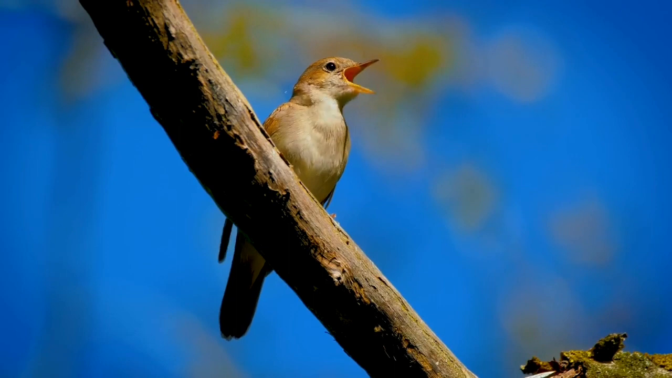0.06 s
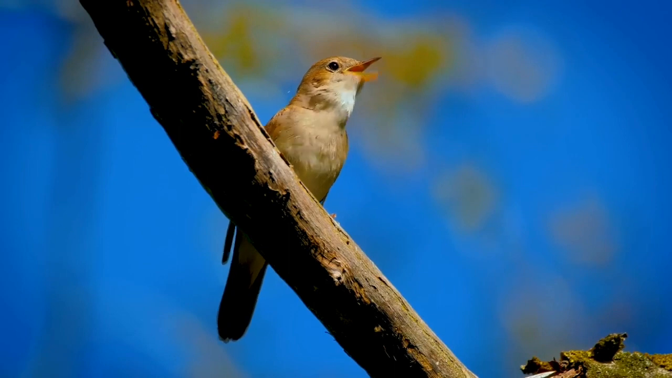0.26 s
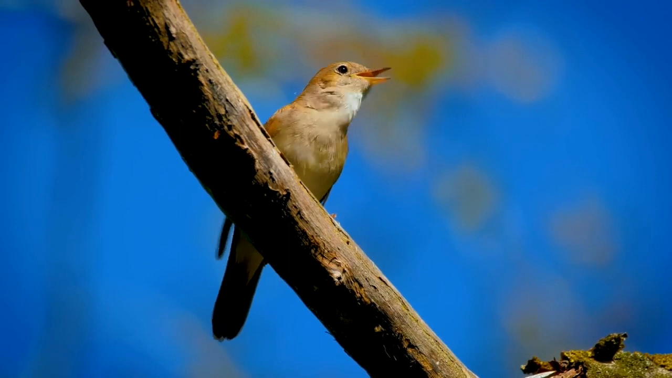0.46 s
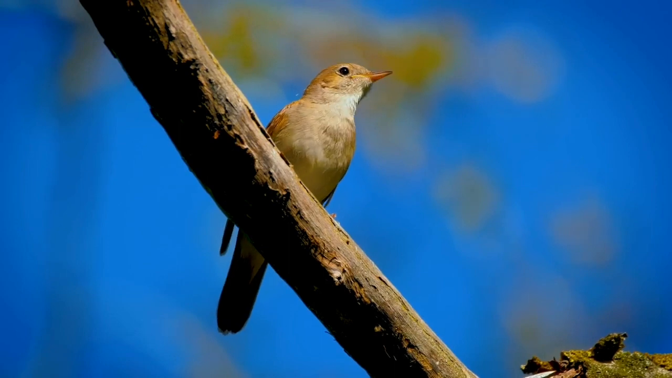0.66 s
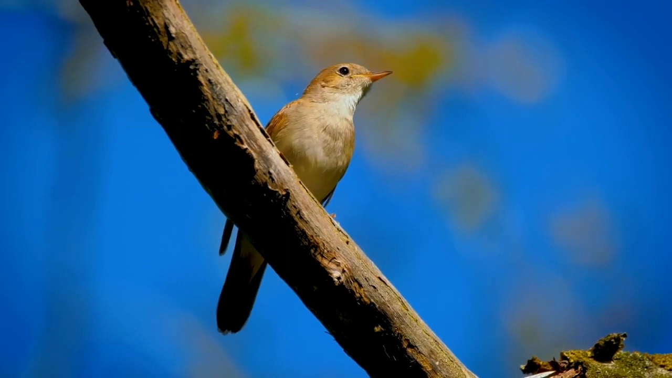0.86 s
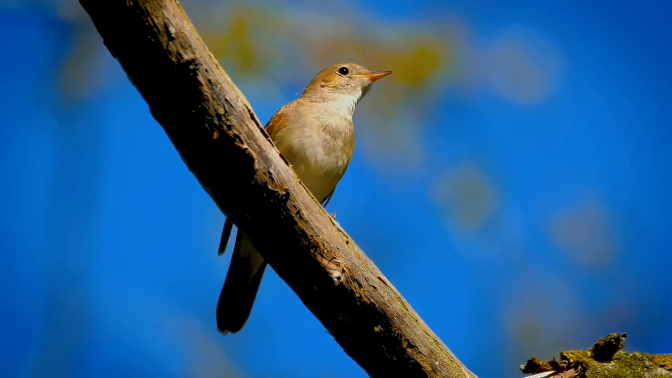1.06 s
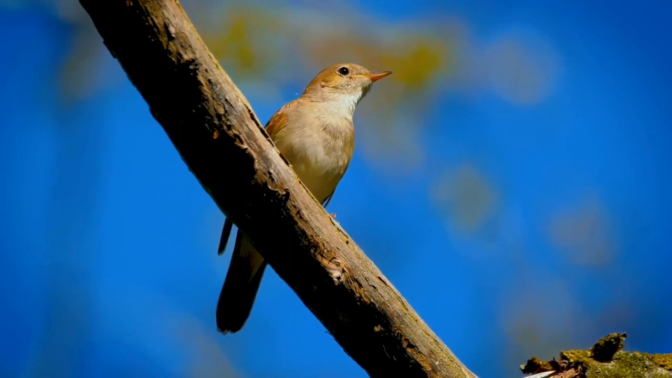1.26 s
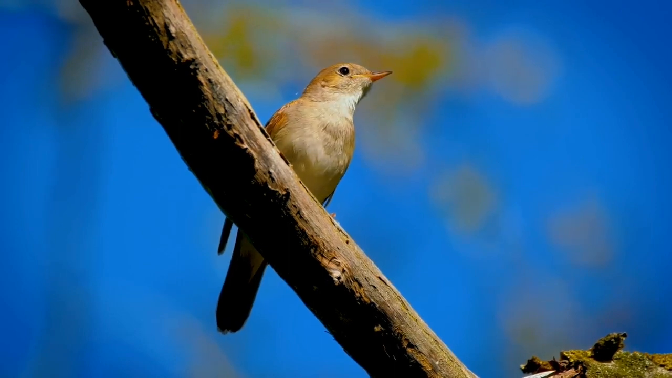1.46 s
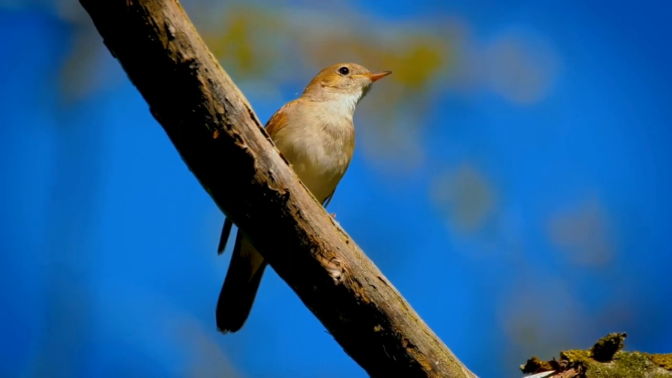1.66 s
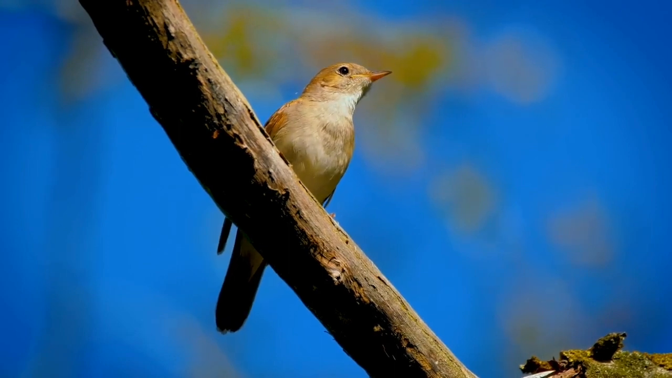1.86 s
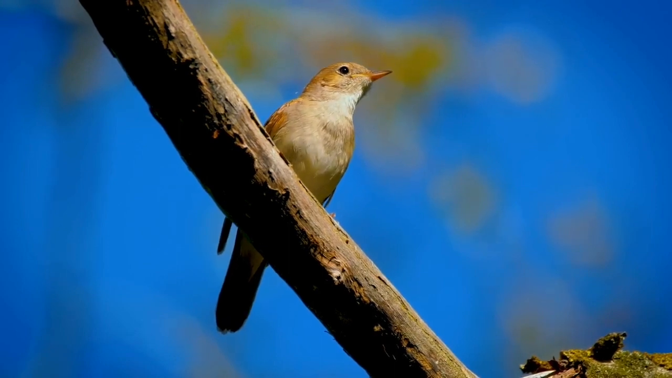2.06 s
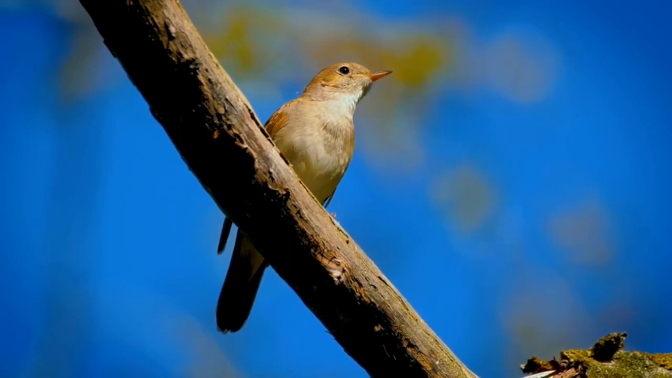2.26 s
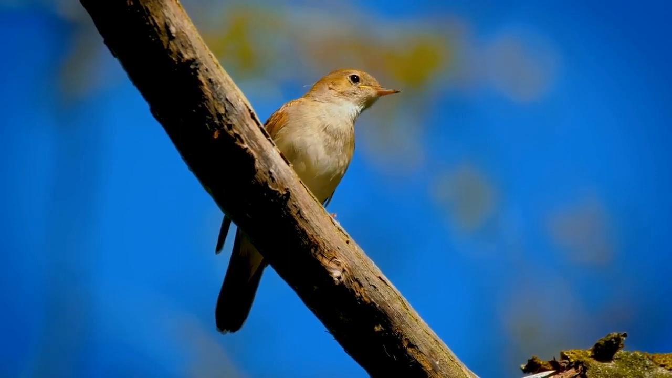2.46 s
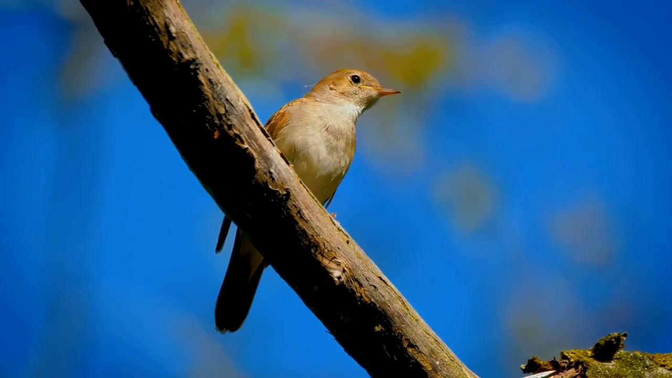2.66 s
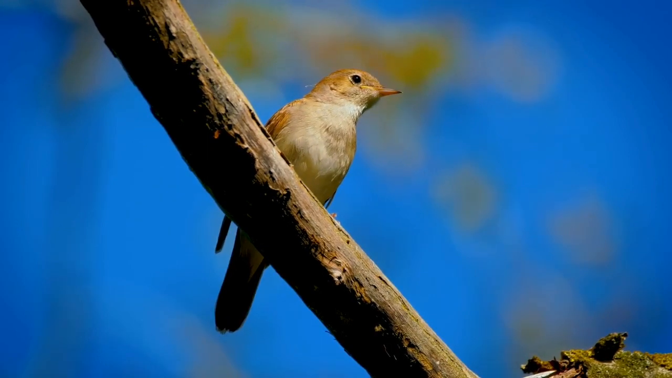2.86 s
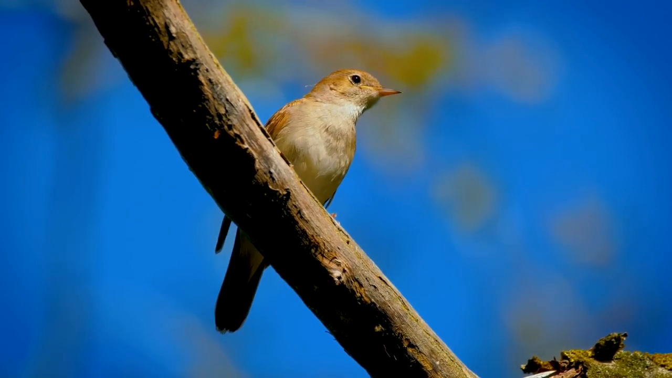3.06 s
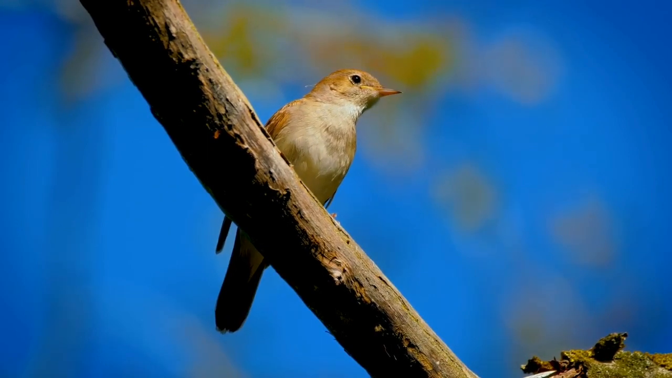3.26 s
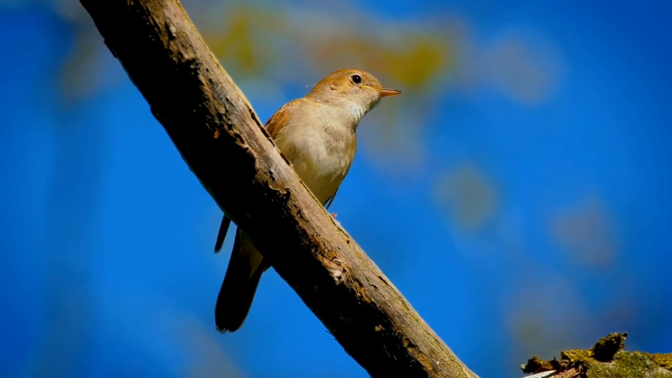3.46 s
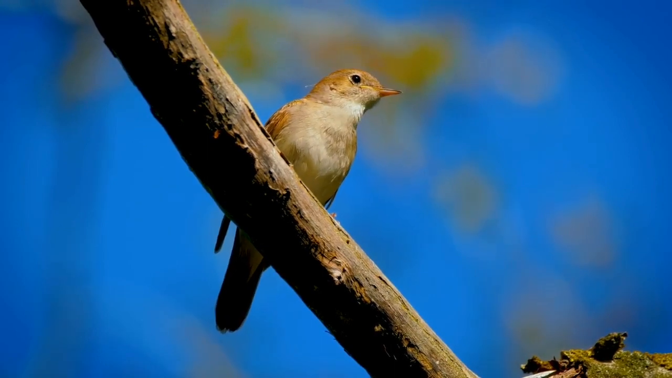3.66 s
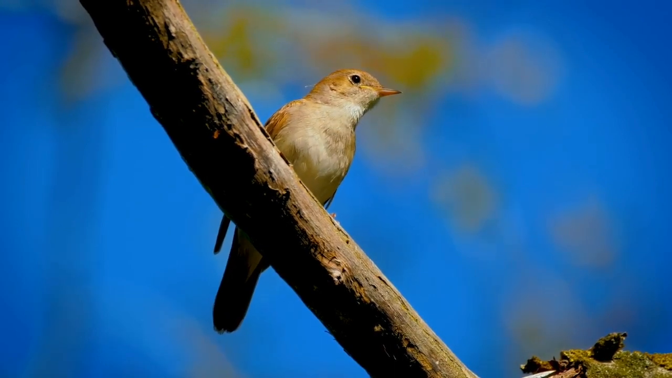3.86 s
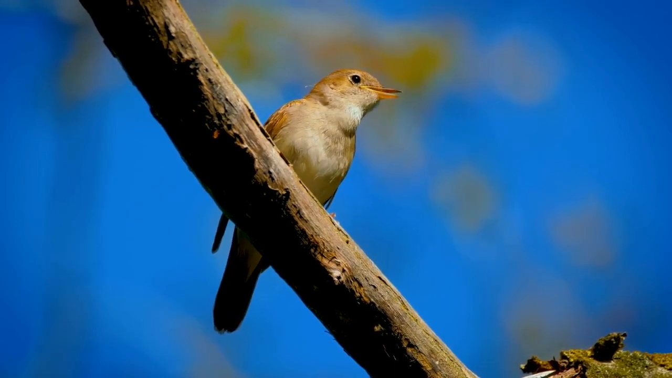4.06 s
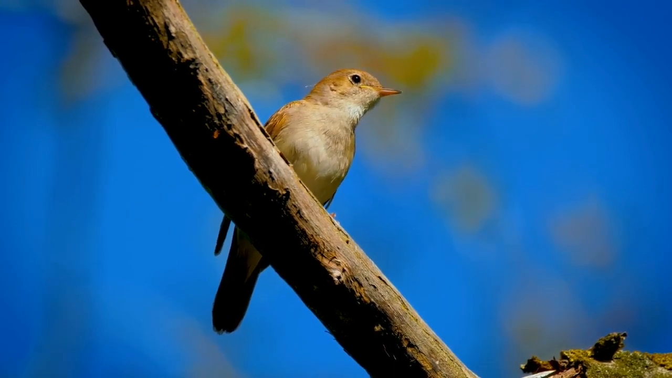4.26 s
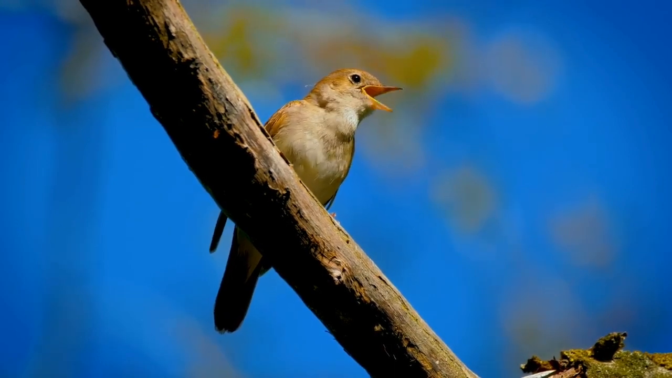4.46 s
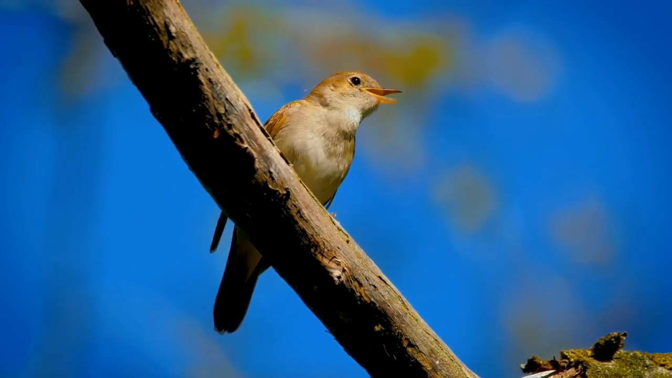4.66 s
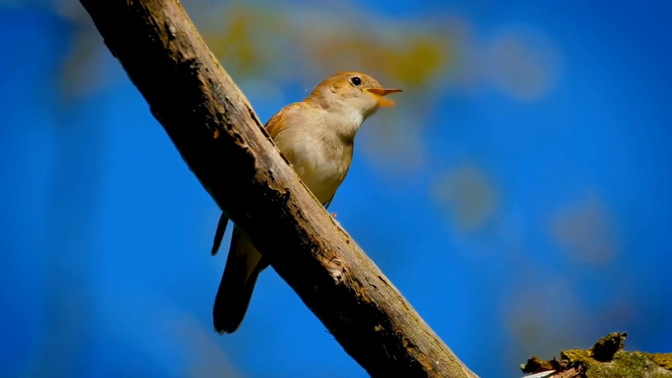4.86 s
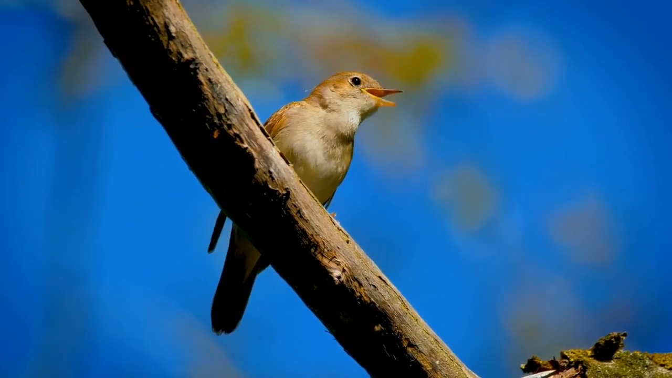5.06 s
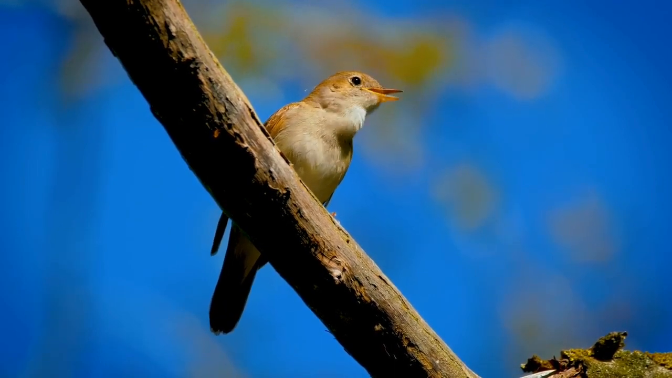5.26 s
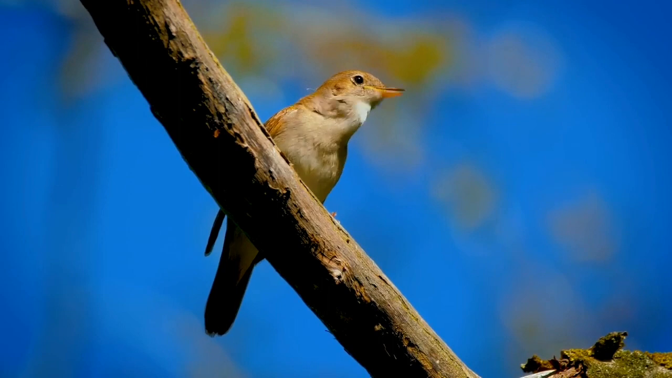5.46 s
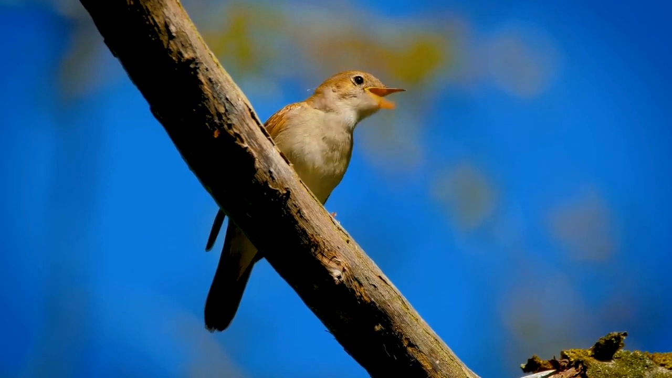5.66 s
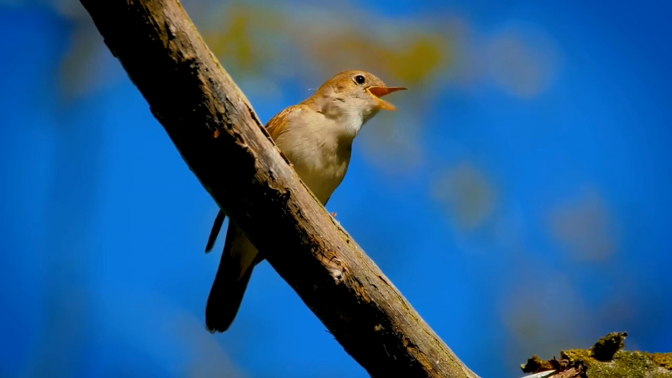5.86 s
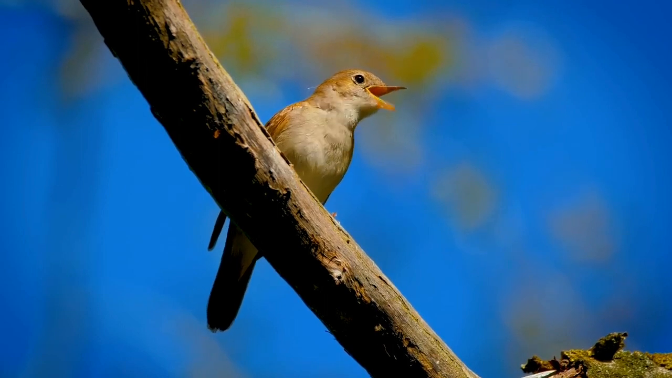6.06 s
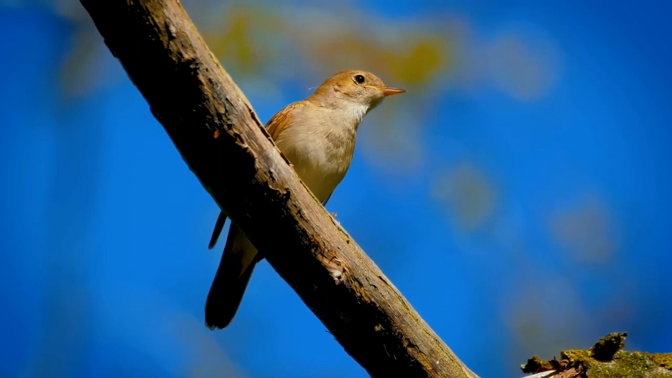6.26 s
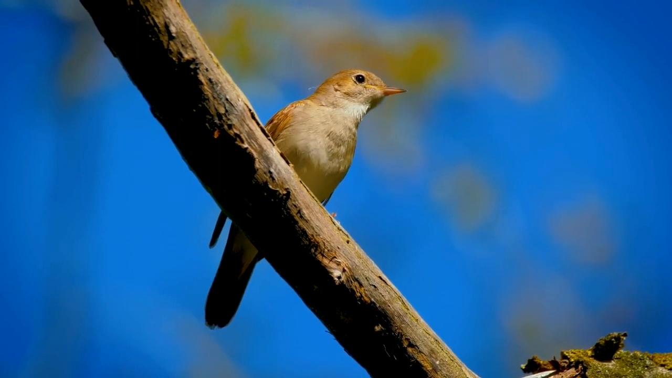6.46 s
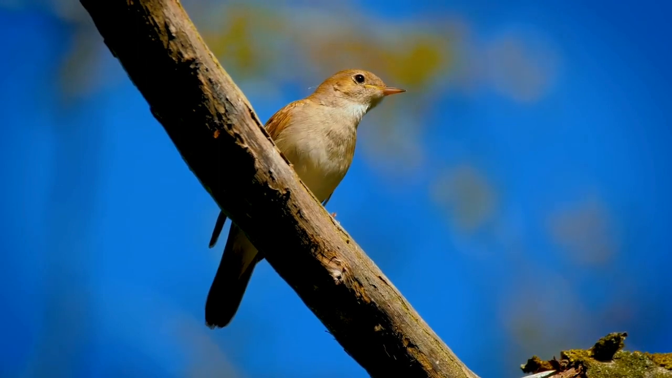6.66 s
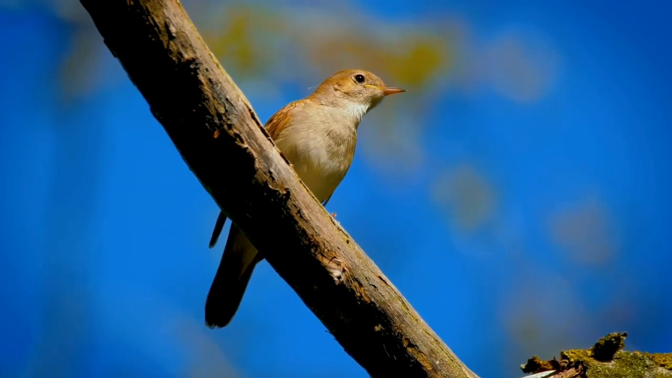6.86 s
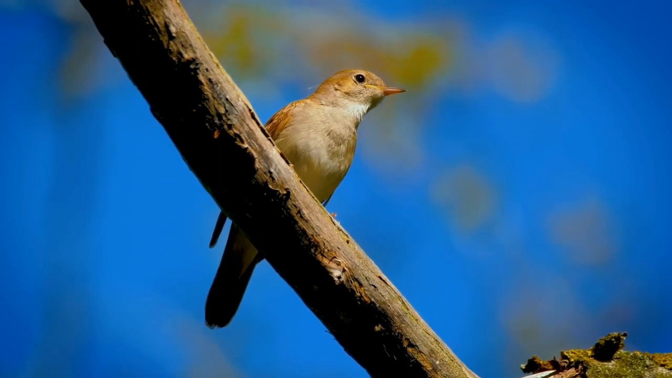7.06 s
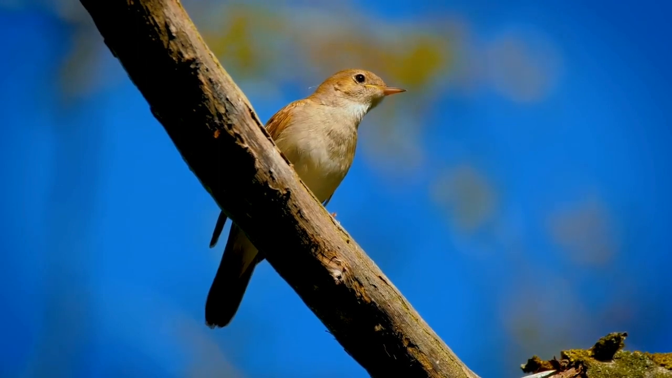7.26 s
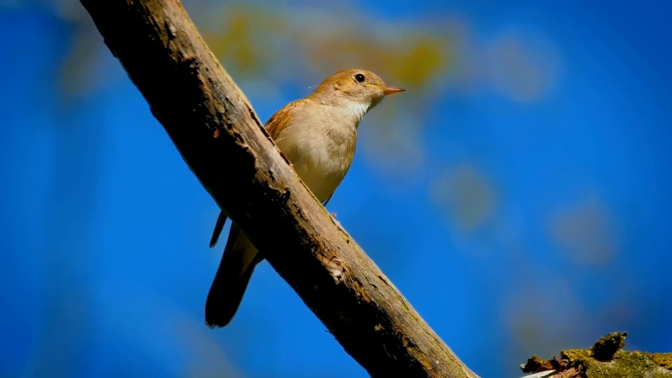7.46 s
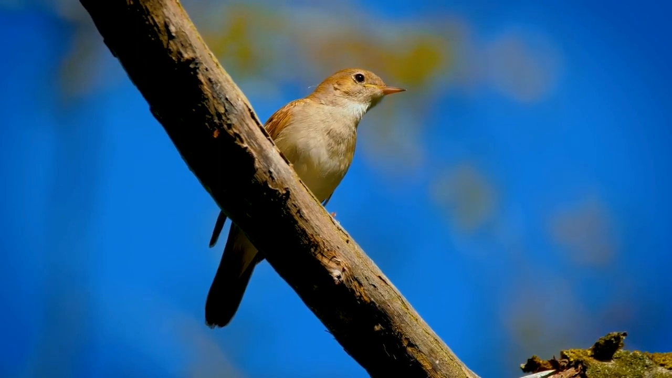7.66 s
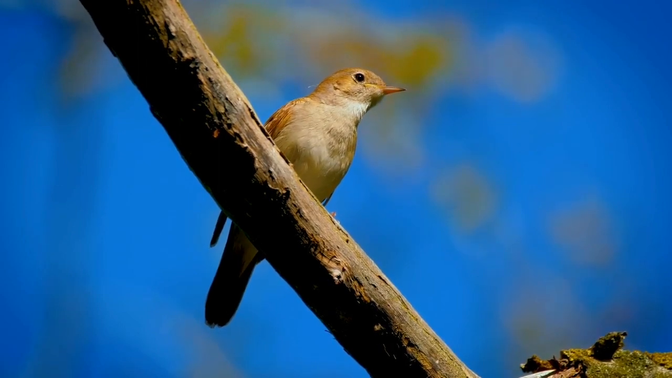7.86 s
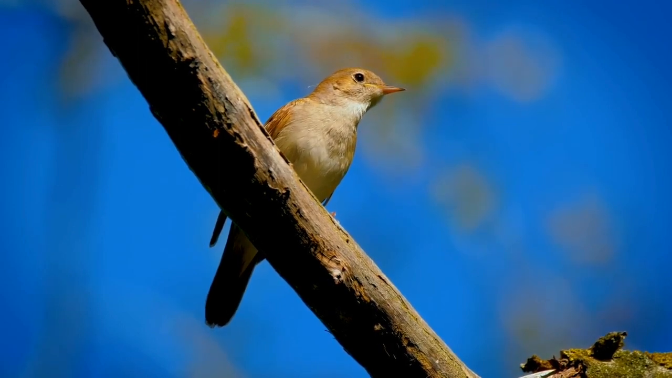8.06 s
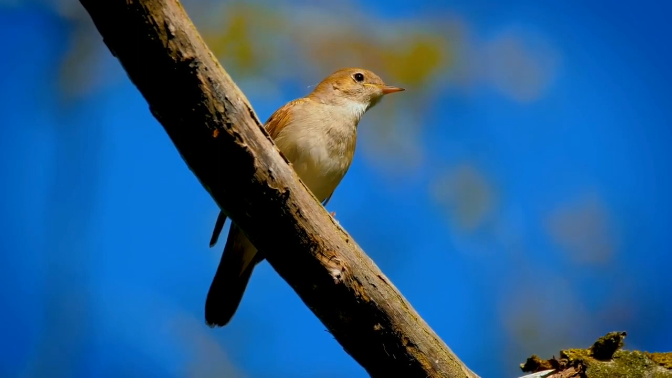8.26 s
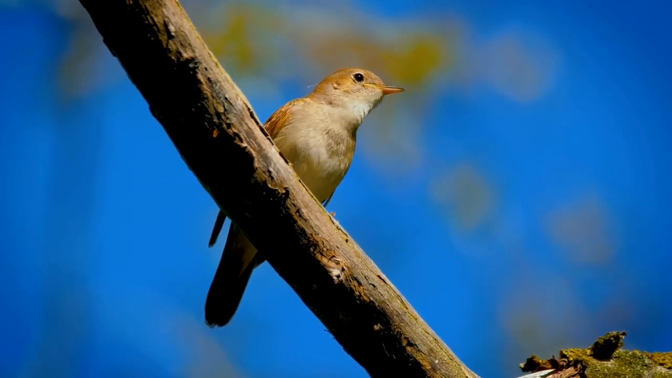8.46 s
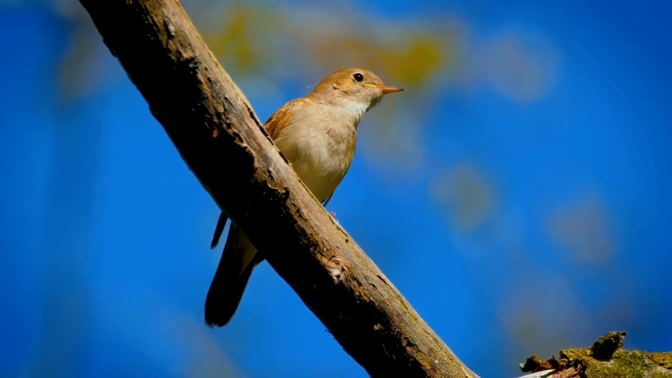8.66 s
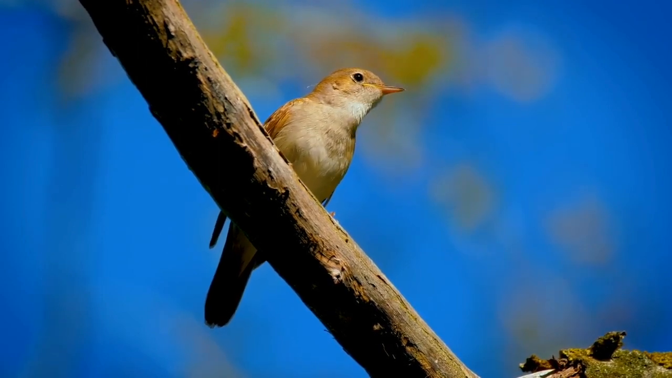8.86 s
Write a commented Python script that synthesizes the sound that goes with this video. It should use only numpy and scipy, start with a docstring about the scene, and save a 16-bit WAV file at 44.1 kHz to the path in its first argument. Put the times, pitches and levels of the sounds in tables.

```python
"""Outdoors among trees, a songbird on a branch sings slides and warbles straight into a close microphone.
Quieter birds call far behind it; a rival whose echo spreads wide answers with a trill, arches and rattles.
Birds are gliding tones with overtones and breath; warbles swing pitch and level together.
Branches return noise-shaped echo, thin in the middle for the birds ahead and wide for the rival.
Earlier song dies away at the start, over a soft rush of filtered noise."""
import sys
import numpy as np
from scipy import signal
from scipy.fft import rfft, irfft, next_fast_len
from scipy.io import wavfile
from scipy.ndimage import map_coordinates

SR = 44100
rng = np.random.default_rng(int(sys.argv[2]) if len(sys.argv) > 2 else 0)


def wav_out(sig):
    """Save sig, one row per channel (or a flat mono array), as 16-bit PCM at SR to the path in sys.argv[1]."""
    wavfile.write(sys.argv[1], SR, np.round(np.clip(np.atleast_2d(sig).T, -1, 1) * 32767).astype(np.int16))


N = 392921

# Note levels are nominal: partials, dips, flutter and small trims come on top.
# outdoor rush, relative spectrum: freq_hz, level_db; then its width: freq_hz, side_minus_middle_db
RUSH = [(30, -38), (70, -49), (130, -27.5), (300, -11), (700, -3.5), (1500, -5), (3500, -5.5), (5500, -14),
        (9000, -22), (15700, -23.5)]
RUSH_SIDE = [(130, -23), (250, -14), (500, -14), (3000, -11), (12000, -4)]
RUSH_DB = -44.5
# song just ended, relative spectrum: freq_hz, level_db
EARLIER = [(1800, -54), (2700, -4), (4200, -4), (5000, -6), (6500, -7), (8200, -7), (9500, -36.5)]
EARLIER_DB, EARLIER_T60_S = -32.5, 1.32
# echo decay among the branches: freq_hz, t60_s
TREES = [(1500, 1), (4000, 1), (9000, 0.59)]
TOP_HZ = 15800
# partials of a clear note: level_db
OVERTONES = [1, -38, -45, -56, -50]

# near bird, beating shape: length_s, pitch_ratios, beat_hz, levels_db (early, middle, late)
BUZZ = (.036, [1.29, 1.022, 0.81], 134, [-16.5, -4, -3])
# start_s, middle_hz, swing_share, lead_turns, level_db
BUZZES = [(.023, 6520, 0.087, 0.58, -6.5), (.109, 6790, 0.058, 0.23, -7.5), (.203, 6800, 0.04, .91, -8.5)]
# near bird, syllable shapes: length_s, pitch_ratios at even steps, levels_db (early, middle, late)
SCOOP = (.053, [.5, .84, 1.0, 1.077, 1.09], [-17, 0, -2.5])
CREST = (.054, [.83, .865, .925, 1, .89, .77, 0.52], [-5.5, 0, -10.5])
LIFT = (0.0281, [.855, 0.929, 1, 1.05, 1.075], [-3, 0, -0.8])
DROP = (.027, [1.24, 1.147, 0.987, 0.827, 0.65], [0, -4, -17.5])
ZIP = (0.011, [.464, .755, 1.0, 1.31, 1.48], [-2, 0, -6])
# each syllable as sung: start_s, middle_hz, level_db
SCOOPS = [(0.282, 2218, -5), (.461, 2115, -9)]
CRESTS = [(.366, 3416, -5), (.553, 3297, -5.5)]
LIFTS = [(5.43, 2670, -5.5), (5.555, 2620, -5.5), (5.672, 2698, -5)]
DROPS = [(5.474, 1838, -8.5), (5.596, 1935, -9), (5.716, 1930, -9.5)]
ZIPS = [(6.127, 5140, -7), (6.226, 5490, -14.5)]
# partials of a scoop: level_db
SCOOP_PARTIALS = [0, -33, -54]
# whistles sung once: start_s, length_s, five pitches_hz at even steps, early_db, middle_db, late_db
WHISTLES = [(2.176, 0.097, 2355, 2213, 2597, 2564, 2660, -44, -39.5, -42),
            (5.812, 0.03, 4640, 4975, 4990, 5086, 4730, -15, -9, -11.5),
            (5.853, 0.037, 7460, 7280, 6660, 6470, 5070, -25, -14, -12),
            (5.936, 0.042, 2120, 2166, 2225, 2237, 2090, -15.5, -5.5, -15.5),
            (6.01, 0.053, 2785, 2808, 2633, 2512, 2560, -8, -5.5, -8),
            (6.164, 0.01, 3550, 3160, 2800, 2370, 1990, -9, -27, -29),
            (6.238, 0.023, 7250, 5940, 5200, 4730, 3840, -25.5, -14.5, -11)]
# short noisy note with a strong echo, ending the first phrase: start_s, level_db
TACK = (.658, -13.5)
# its noise, relative spectrum: freq_hz, level_db
TACK_COLOUR = [(470, -68), (800, -49), (3250, -8.5), (5750, -3), (9090, -33), (14000, -18.5),
               (15500, -49.5)]
# its nasal fall: length_s, start_hz, middle_hz, end_hz; then its partials: level_db
TACK_TONE = (0.018, 1750, 1450, 950)
TACK_PARTIALS = [-17.5, -1, -5, -11]
# long warbles: start_s, length_s, start_hz, end_hz, swing_share, beat_hz, lead_turns, first_db, full_db
ROLLS = [(3.818, .11, 3714, 3660, 0.098, 40.1, .31, -32, -15.5),
         (4.138, 0.16, 3527, 3594, 0.095, 44.1, 0.2, -28, -9.5),
         (4.46, .18, 3595, 3754, .09, 44.25, 0.049, -28, -7.5),
         (4.774, .224, 3757, 3680, .105, 42.9, 0.37, -25, -5.5),
         (5.151, .19, 3723, 3631, .11, 43.04, 0.11, -17.5, -5.5)]
# swing through a roll, as ratios of swing_share: start, middle, end; then partials: level_db
ROLL_SWING = [.56, 1.02, 0.67]
ROLL_PARTIALS = [-1, -45.5, -42.5, -52.5]
ROLL_SWELL_DB_PER_S, ROLL_TIRE_DB_PER_S = 210.5, 15
ROLL_HURRY = .14  # share by which the softest beat runs faster
ROLL_SHARP = 0.41  # trough sharpness per unit of effort above 0.3
ROLL_DIP_DB, ROLL_LAG_RAD = 13.21, 0.71  # dip once a turn at full effort, and its lag
ROLL_LEAN_RAD = .7  # at full effort the trough comes this early: quick fall, slow climb
# beating shape: length_s, pitch_ratios, swing_shares, beat_hz, levels_db (early, middle, late)
TUMBLE = (0.025, [1.36, 0.97, 0.75], [0.051, 0.085, .04], 117.5, [-0.5, -0.8, 0])
# start_s, middle_hz, lead_turns, level_db
TUMBLES = [(6.143, 4200, .33, -6.5)]

# rival, slides: start_s, length_s, start_hz, end_hz, level_db
RIVAL_SLIDES = [(.62, 0.061, 2324, 3337, -33.5), (5.287, 0.021, 7140, 5680, -50),
                (5.38, 0.025, 6900, 5280, -49), (5.478, 0.027, 4670, 4750, -33.5),
                (6.78, 0.031, 6650, 6300, -40.5), (6.865, 0.0059, 3610, 3500, -32.5),
                (6.929, 0.021, 4430, 1890, -30), (7.268, 0.023, 3590, 4140, -41),
                (7.29, .018, 4140, 3500, -51), (7.412, 0.0062, 2230, 1700, -34),
                (7.43, 0.01, 3030, 2240, -39.5)]
# rival, rattles: start_s, length_s, start_hz, middle_hz, end_hz, swing_share, beat_hz, lead_turns,
# early_db, late_db
RIVAL_WARBLES = [(5.5, 0.079, 4300, 4490, 4670, 0.19, 73.9, 0.86, -28.5, -26.5),
                 (7.029, 0.051, 5330, 4830, 3740, 0.089, 123.2, 0.32, -27, -28),
                 (7.069, 0.12, 3640, 3450, 2843, 0.15, 122.3, 0.13, -26.5, -28),
                 (7.186, 0.097, 2802, 2616, 2440, 0.14, 65, 0.29, -25.5, -26.5),
                 (7.284, 0.092, 2373, 2200, 2200, 0.16, 56.1, 0.25, -30.5, -37.5)]
# rival, even trill: start_s, level_db; then pitch_hz through one syllable
TRILL = [(5.669, -17.5), (5.732, -16.5), (5.797, -17.5), (5.858, -14), (5.92, -15), (5.985, -17),
         (6.05, -15.5), (6.114, -14), (6.176, -14.5)]
ARCH = [3720, 4380, 3660, 3297, 3940]
# rival, arched syllable: length_s, pitch_ratios, levels_db; then start_s, middle_hz, level_db
BOW = (.077, [1.02, 1.15, 1.215, 1.02, .83, 0.725, 0.72], [0, -2.5, -12])
BOWS = [(6.237, 3228, -15.5), (6.415, 3160, -15), (6.59, 3183, -16)]
# rival, repeated notes (a flick follows each bow): length_s, start_hz, middle_hz, end_hz;
# then start_s, level_db
FLICK = (0.017, 5400, 4150, 3550)
FLICKS = [(6.339, -21), (6.515, -20.5), (6.69, -20)]
HOOP = (.032, 4300, 7300, 4700)
HOOPS = [(6.778, -41), (6.855, -39)]
WIGGLE = (0.0376, 1440, 2200, 1830)
WIGGLES = [(7.047, -55), (7.078, -51), (7.112, -53)]

# far birds, plain slides: start_s, length_s, start_hz, end_hz, level_db
SLIDES = [(1.49, 0.056, 3190, 3690, -53), (1.55, 0.073, 3660, 3580, -51.5), (1.845, .03, 5000, 3940, -64),
          (1.85, 0.041, 6300, 5200, -59), (1.888, 0.0187, 3550, 2430, -34), (1.906, 0.029, 2500, 1500, -51),
          (2.06, 0.027, 6600, 5400, -52), (2.282, 0.0194, 3310, 2880, -37), (2.298, .014, 3300, 4180, -40),
          (2.52, 0.031, 5240, 5170, -54), (2.6, 0.019, 6200, 4100, -42), (2.683, .018, 6000, 6320, -41),
          (2.693, 0.03, 6100, 4080, -40), (2.772, 0.031, 2120, 1916, -37), (2.819, 0.027, 2990, 2230, -39),
          (3.197, 0.0067, 3600, 3710, -42), (3.209, 0.041, 3500, 2870, -56), (3.402, 0.05, 4200, 2620, -43),
          (3.735, 0.022, 4010, 3180, -39), (4.0, 0.064, 4060, 4650, -51), (7.49, 0.26, 3815, 3605, -52.5),
          (7.41, .011, 3280, 4610, -22), (7.419, 0.0088, 4700, 5650, -35.5),
          (7.436, 0.012, 4270, 3200, -29.5), (7.61, 0.077, 4300, 4236, -54),
          (7.665, 0.037, 2800, 2420, -37.5), (7.805, 0.05, 3900, 3870, -43.5),
          (7.97, 0.0314, 3040, 2595, -42), (8.07, 0.046, 3725, 4060, -38), (8.109, 0.0048, 5000, 6000, -35),
          (8.128, 0.04, 6170, 4260, -39.5), (8.245, .05, 3850, 3130, -46.5),
          (8.02, 0.0092, 4850, 4350, -44), (8.33, .03, 1800, 1650, -47), (8.375, 0.037, 1750, 1820, -55),
          (8.49, 0.056, 2900, 2780, -37), (8.704, 0.062, 2050, 2117, -39), (1.19, .14, 3300, 2535, -53),
          (3.975, 0.029, 5000, 4750, -53), (7.82, 0.0174, 5010, 4400, -49), (7.85, 0.042, 4000, 2910, -40),
          (8.05, 0.027, 3640, 3200, -42)]
HALFWAY = .58  # share of a slide's path covered at half time
# far birds, repeated notes: length_s, start_hz, middle_hz, end_hz; then start_s, level_db
RUNG_UP = (.048, 1700, 2180, 2560)
RUNGS_UP = [(7.698, -38), (7.845, -38), (7.998, -36)]
RUNG_DOWN = (.048, 2720, 2450, 1790)
RUNGS_DOWN = [(7.535, -37.5), (7.74, -41), (7.929, -37.5)]
HUMP = (0.031, 2300, 2330, 2100)
HUMPS = [(2.651, -41.5), (2.842, -41.5), (3.024, -38.5)]
# thin high tones leading into the pipes, same columns
THREAD = (0.089, 5000, 6650, 3900)
THREADS = [(4.365, -74), (4.834, -56), (5.3, -62)]
# far birds, beating shape: length_s, pitch_ratios, swing_shares, beat_hz, levels_db
PURR = (.066, [1.04, 0.93, 0.95], [.11, 0.094, 0.13], 72, [-1.7, 0, -9])
# start_s, middle_hz, lead_turns, level_db
PURRS = [(2.553, 3970, 0.6, -35.5), (2.738, 3790, .3, -36), (2.92, 3810, .81, -36.5)]
# low double notes: start_s, chirp_db, first_db, second_db
CHUCKS = [(2.97, -38, -39, -36.5), (3.1, -37.5, -40, -36.5), (3.222, -40.5, -41, -33),
          (3.345, -40.5, -41, -34.5), (3.472, -37.5, -35.5, -32), (3.598, -44.5, -43, -31.5),
          (3.73, -37.5, -37, -31), (3.863, -36.5, -37, -36.5)]
# steep chirp ahead of each: length_s, start_hz, middle_hz, end_hz
CHIRP = (.012, 5700, 4200, 2600)
CHIRP_LEAD_S = 0.016
# nasal calls rich in overtones: start_s, level_db; then partials: level_db
HARSH = [(3.565, -38.5), (8.56, -34.5)]
NASAL = [-4.5, 19.5, 20.5, 10, -16]
# far notes settling on a held pitch: glide_s, start_ratio, hold_loss_db;
# then start_s, length_s, held_hz, level_db
HOOK = (0.034, 1.53, 15.3)
HOOKS = [(4.191, 0.086, 2616, -31), (4.645, 0.15, 2605, -27.5), (5.094, 0.16, 2570, -28)]
PIPE = (0.015, 1.06, 4.1)
PIPES = [(4.415, 0.13, 4632, -36.5), (4.876, 0.092, 4620, -32), (5.33, 0.099, 4630, -37)]
# far low creaks: length_s, start_hz, end_hz; then start_s, level_db; then partials: level_db
CROAK = (0.013, 950, 593)
CROAKS = [(8.843, -37.5), (8.868, -32), (8.895, -30)]
CROAK_PARTIALS = [-18, 3, 12.5, 14.5, -1, 5.5]


def amp(db):
    """Gain of a level in dB."""
    return 10 ** (np.asarray(db) / 20)


def along(points, hz):
    """Interpolate (freq_hz, value) points on a log frequency axis."""
    f, v = np.transpose(points)
    return np.interp(np.log(hz + 1), np.log(f + 1), v)


def filtered(x, response):
    """Shape the spectrum of x by a response of frequency."""
    m = next_fast_len(x.shape[-1] + 8192)
    spectrum = rfft(x, m) * response(np.fft.rfftfreq(m, 1 / SR))
    return irfft(spectrum, m)[..., :x.shape[-1]]


def spread(pair, side_db):
    """Left and right from a middle and a side signal."""
    middle, side = pair[0], amp(side_db) * pair[1]
    return np.array([middle + side, middle - side])


def through(values, u):
    """The smooth curve through evenly spaced values, u from 0 to 1."""
    knots = np.linspace(0, 1, len(values))
    return np.polyval(np.polyfit(knots, values, len(values) - 1), u)


def span(length):
    """Progress from 0 to 1 over a note."""
    return np.linspace(0, 1, max(round(length * SR), 20))


def thirds(levels_db, u):
    """Gain that passes through one level in each third of the note."""
    return amp(np.interp(u, [.1, .5, .9], levels_db))


def blank():
    """Empty track with room for late notes: direct sound in row 0, echo send in row 1."""
    return np.zeros((2, N + SR))


def add(track, s, hz, gain, partials_db=OVERTONES, edge=0.0046, hiss_db=-138):
    """A gliding tone with soft ends into row 0, and what the trees get of it into row 1."""
    t = np.arange(len(hz)) / SR
    phase = 2 * np.pi * (np.cumsum(hz) / SR + rng.random())
    far = 1 / np.max(gain)  # a faint note is a far one
    # high notes open the beak; distance dulls the overtones
    beak = amp(41.3 * np.maximum(np.log2(hz / 4200), 0)) * far ** -.4
    tone = 0
    for k, db in enumerate(partials_db, start=1):
        partial = amp(db) * np.sin(k * phase) * (k * hz < SR / 2)
        tone = tone + partial * beak ** (k > 1)
    # steep slides are breathy
    slope = np.abs(np.gradient(hz) * SR)
    hiss = amp(hiss_db) * slope * np.diff(rng.standard_normal(len(t) + 1)) * far ** -.3
    flutter = map_coordinates(rng.standard_normal(len(t) // 100 + 4), [t * 200])
    ends = np.sin(np.pi / 2 * np.clip(np.minimum(t, t[-1] - t) / edge, 0, 1)) ** 2
    # air and leaves shake the level on a long path
    heard = gain * ends * (tone + hiss) * far ** (0.084 * flutter)
    # echo loses less with distance than direct sound
    track[:, round(s * SR):][:, :len(t)] += heard * [[1], [far ** 0.38]]


def sung(shape, events):
    """Whistle rows from one shape."""
    length, pitch, levels_db = shape
    return [(s, length, *hz * np.array(pitch), *db + np.array(levels_db)) for s, hz, db in events]


def beaten(shape, events):
    """Warble rows from one shape."""
    length, pitch, swing, beat, levels_db = shape
    return [(s, length, *hz * np.array(pitch), *swing, beat, lead, *db + np.array(levels_db))
            for s, hz, lead, db in events]


def slid(table):
    """Note rows that move faster at first."""
    return [(s, length, a, a + HALFWAY * (b - a), b, db) for s, length, a, b, db in table]


def repeated(shape, events):
    """Note rows from one shape."""
    return [(s, *shape, db) for s, db in events]


def rush():
    """Distant leaves and traffic: coloured noise, nearly steady."""
    def colour(hz):
        return amp(along(RUSH, hz) + [0 * hz, along(RUSH_SIDE, hz)])

    slow = map_coordinates(rng.standard_normal(40), [np.arange(N) * 3 / SR])
    pair = filtered(rng.standard_normal((2, N)), colour)
    return amp(RUSH_DB + 0.68 * slow) * spread(pair / pair[0].std(), side_db=0)


def earlier():
    """The dying echo of the song that went before: coloured noise in steady decay."""
    pair = filtered(rng.standard_normal((2, N)), lambda hz: amp(along(EARLIER, hz)))
    decay_db = EARLIER_DB - 60 * np.arange(N) / SR / EARLIER_T60_S
    return amp(decay_db) * spread(pair / pair.std(), side_db=-9)


def trees(x, side_db, swell, swell_t60):
    """Scattered echo, near branches first, treble dying soonest; each stretch of sound meets other branches."""
    out, step = np.zeros((2, N + 2 * SR)), SR // 5
    fade = np.hanning(2 * step + 1)[:-1]  # overlapping stretches sum to one
    x = np.pad(x, (step, 2 * step))
    for start in range(0, N + step, step):
        hz, t, z = signal.stft(rng.standard_normal((2, SR)), SR, nperseg=256)
        decay = amp(-60 * t / along(TREES, hz)[:, None])
        near_branches = 1 + swell * amp(-60 * t / swell_t60)
        tail = signal.istft(z * decay * near_branches, SR, nperseg=256)[1]
        stretch = x[None, start:start + 2 * step] * fade
        wet = signal.fftconvolve(stretch, tail / np.linalg.norm(tail[0]), axes=1)
        out[:, start + 150:][:, :wet.shape[1]] += wet  # 150 samples of extra path
    return spread(out[:, step:step + N], side_db)


def warbles(table, sharp, pulse_db, lag):
    """Pitch swings with round crests and sharp troughs; once a turn the sound weakens, more at full effort."""
    track = blank()
    loudest = amp(np.max([row[-3:] for row in table]))
    for s, length, a, b, c, d, e, f, rate, lead, *levels in table:
        u = span(length)
        turn = 2 * np.pi * (rate * length * u - lead)
        effort = thirds(levels, u) / loudest
        swing = np.cos(turn) - effort * sharp * np.cos(2 * turn)
        hz = through([a, b, c], u) * (1 + np.interp(u, [0, .5, 1], [d, e, f]) * swing)
        level_swing_db = effort * pulse_db * (np.cos(turn - lag) - .6 - sharp * np.cos(2 * turn))
        add(track, s, hz, thirds(levels, u) * amp(level_swing_db), hiss_db=-143)
    return track[:, :N]


def buzzes():
    """The near bird's opening notes, high and beating fast at an even swing."""
    length, pitch, beat, levels_db = BUZZ
    rows = []
    for s, hz, swing, lead, db in BUZZES:
        rows += beaten((length, pitch, [swing] * 3, beat, levels_db), [(s, hz, lead, db)])
    return warbles(rows, sharp=0.5, pulse_db=6, lag=1.1)


def whistles(table, partials_db=OVERTONES):
    """Each whistle is one smooth slide of the syrinx."""
    track = blank()
    for s, length, *rest in table:
        u = span(length)
        level_db = np.polyval(np.polyfit([.1, .5, .9], rest[-3:], deg=2), u)
        add(track, s, through(rest[:-3], u), amp(level_db), partials_db, edge=.005)
    return track[:, :N]


def notes(table):
    """Short plain slides."""
    track = blank()
    for s, length, *pitch, db in table:
        add(track, s, through(pitch, span(length)), amp(db), edge=min(0.15 * length, .012))
    return track[:, :N]


def tack():
    """A nasal fall in a burst of noise that dies in a few hundredths of a second, with a strong echo."""
    track, t = np.zeros((2, N)), np.arange(SR // 10) / SR
    start, level_db = TACK
    burst = filtered(rng.standard_normal(len(t)), lambda hz: amp(along(TACK_COLOUR, hz)))
    envelope = amp(level_db - 1.0 - 60 * t / 0.065) * np.minimum(t / 0.00063, 1)
    track[:, round(start * SR):][:, :len(t)] = envelope * burst / burst.std()
    length, *pitch = TACK_TONE
    u = span(length)
    add(track, start, through(pitch, u), amp(level_db) * thirds([0, -4, -14], u), TACK_PARTIALS, edge=.001)
    return track * amp([[0], [5]])  # the trees get more of it


def others():
    """Low double notes and nasal calls."""
    track = blank()
    for s, db in HARSH:
        add(track, s, through([1750, 1320, 1290], span(0.0166)), amp(db - 0.5), NASAL, edge=0.0012)
        add(track, s + .014, through([1550, 1950, 2150], span(.021)), amp(db - 3), [0, 26, 6])
    for s, _, first_db, second_db in CHUCKS:
        add(track, s, through([1750, 1620], span(0.012)), amp(first_db))
        add(track, s + .029, through([2200, 1480], span(0.013)), amp(second_db - 1.5))
    track[1] *= .7  # these callers sit in the open, with fewer branches round them
    return track[:, :N]


def rolls():
    """The level climbs until it is full, then sags; with effort the beat slows, troughs sharpen and dip."""
    track = blank()
    loudest_db = max(row[-1] for row in ROLLS)
    for s, length, a, b, swing, beat, lead, first_db, full_db in ROLLS:
        u = span(length)
        swell_db = first_db + ROLL_SWELL_DB_PER_S * length * u
        tire_db = full_db - ROLL_TIRE_DB_PER_S * length * u
        level_db = np.minimum(swell_db, tire_db)
        effort = amp(level_db - loudest_db)
        beat_now = beat * (1 + ROLL_HURRY * (1 - effort))
        turn = 2 * np.pi * (np.cumsum(beat_now) / SR - lead)
        leaning = turn + ROLL_LEAN_RAD * effort * np.sin(turn / 2) ** 2
        wave = np.cos(leaning) - ROLL_SHARP * (effort - .3) * np.cos(2 * leaning)
        width = swing * np.interp(u, [0, .5, 1], ROLL_SWING)
        hz = (a + (b - a) * u) * (1 + width * wave)
        depth_db = ROLL_DIP_DB * (0.27 + effort) / 1.27
        dip_db = depth_db * np.abs(np.sin((leaning - ROLL_LAG_RAD) / 2)) ** 3.6
        add(track, s, hz, amp(level_db + 2.0 - dip_db), ROLL_PARTIALS, hiss_db=-150)
    return track[:, :N]


def settling(shape, events):
    """The pitch falls quickly onto a held, softer tone."""
    track = blank()
    glide, start, loss_db = shape
    for s, length, hz, db in events:
        left = np.exp(-(span(length) * length / glide) ** 1.7)  # share of the fall still to go
        add(track, s, hz * (1 + (start - 1) * left), amp(db - loss_db * (1 - left) ** 4), edge=0.024)
    return track[:, :N]


def rattles():
    """Rival's warbles of even swing and evenly changing level; the pulse trails the pitch by a quarter turn."""
    rows = [(*head, swing, swing, swing, beat, lead, a, (a + b) / 2, b)
            for *head, swing, beat, lead, a, b in RIVAL_WARBLES]
    rattling = warbles(rows, sharp=.1, pulse_db=14, lag=np.pi / 2)
    return rattling * amp([[1.5], [-1.5]])  # more direct sound, less echo


def trill():
    """One arched syllable repeated, each led by a faint high tick."""
    track = blank()
    for s, db in TRILL:
        u = span(0.023)
        add(track, s, np.interp(u, [0, .18, .35, .5, 1], ARCH), amp(db) * thirds([0, -4, -8], u))
        add(track, s - .011, through([6800, 5800, 5600], span(0.011)), amp(db - 20.0))
    return track[:, :N]


def croaks():
    """Short low creaks, mostly overtones."""
    track = blank()
    length, *pitch = CROAK
    for s, db in CROAKS:
        add(track, s, through(pitch, span(length)), amp(db), CROAK_PARTIALS, edge=0.0029)
    return track[:, :N]


def singer():
    """The near bird's two phrases, and a faint whistle between them."""
    slides = sung(CREST, CRESTS) + sung(LIFT, LIFTS) + sung(DROP, DROPS) + sung(ZIP, ZIPS)
    scooping = whistles(sung(SCOOP, SCOOPS), SCOOP_PARTIALS)
    tumbling = warbles(beaten(TUMBLE, TUMBLES), sharp=0.32, pulse_db=0.5, lag=0.33)
    return buzzes() + scooping + whistles(slides + WHISTLES) + tack() + rolls() + tumbling


def rival():
    """Slides, rattles, trill, bows and flicks of the bird whose echo spreads wide to both sides."""
    rows = slid(RIVAL_SLIDES) + repeated(FLICK, FLICKS)
    rows += repeated(HOOP, HOOPS) + repeated(WIGGLE, WIGGLES)
    return notes(rows) + rattles() + trill() + whistles(sung(BOW, BOWS))


def far_birds():
    """Faint slides, rungs, purrs, double notes, hooks, pipes and croaks."""
    rows = slid(SLIDES) + repeated(RUNG_UP, RUNGS_UP) + repeated(RUNG_DOWN, RUNGS_DOWN)
    rows += repeated(HUMP, HUMPS) + repeated(THREAD, THREADS)
    rows += repeated(CHIRP, [(s - CHIRP_LEAD_S, db) for s, db, *_ in CHUCKS])
    purrs = warbles(beaten(PURR, PURRS), sharp=0.18, pulse_db=7.0, lag=0.5)
    return notes(rows) + purrs + others() + settling(HOOK, HOOKS) + settling(PIPE, PIPES) + croaks()


def scene():
    """All direct song sits in the middle; the near and far birds echo there too, the rival from both sides."""
    middle_birds, wide_bird = singer() + far_birds(), rival()
    echo = trees(amp(-13) * middle_birds[1], side_db=-29.5, swell=2.26, swell_t60=0.12)
    wide_echo = trees(amp(-6.5) * wide_bird[1], side_db=-3.0, swell=5.3, swell_t60=0.029)
    return rush() + earlier() + middle_birds[0] + wide_bird[0] + echo + wide_echo


def record(dry):
    """Nothing passes above the band limit."""
    return filtered(dry, lambda hz: hz < TOP_HZ)


dry = scene()
out = record(dry)
wav_out(out)
```